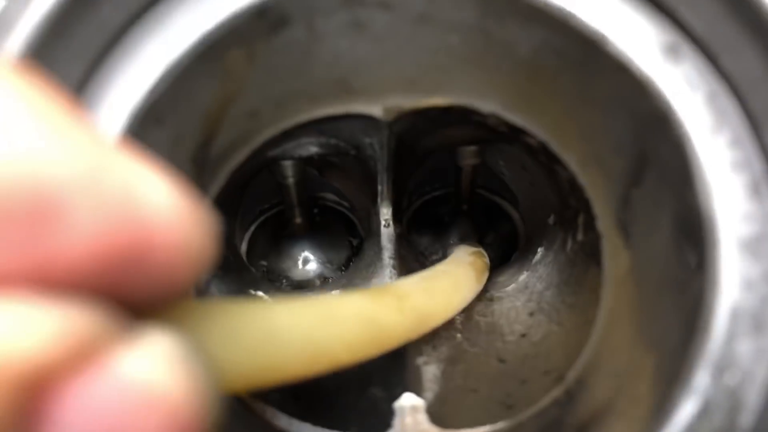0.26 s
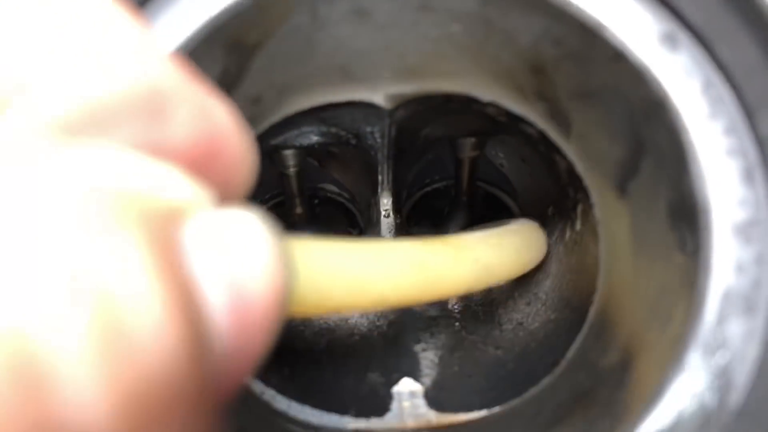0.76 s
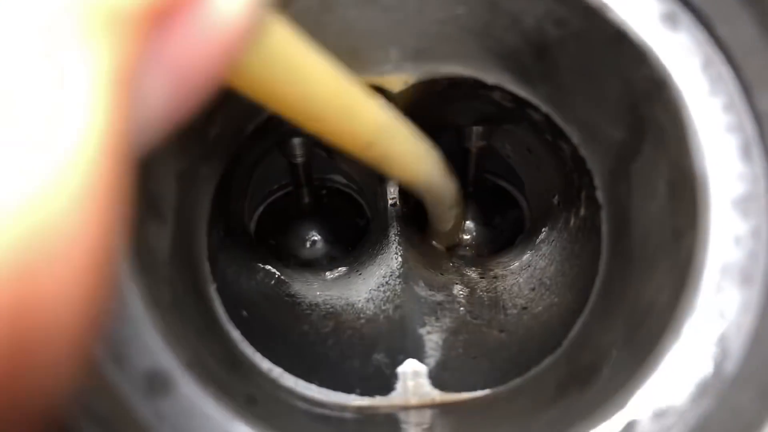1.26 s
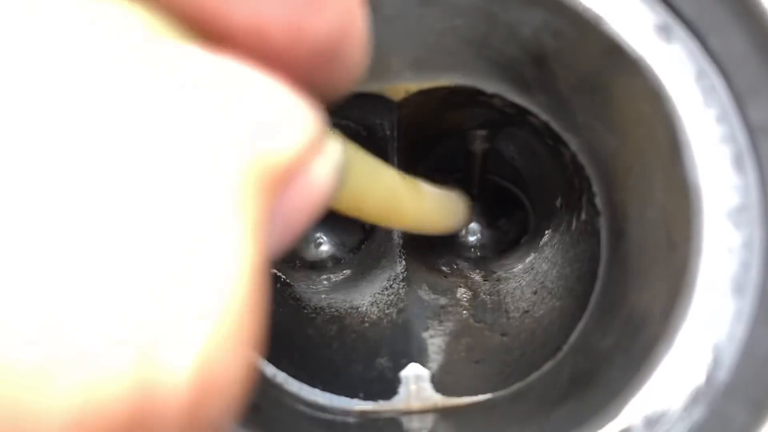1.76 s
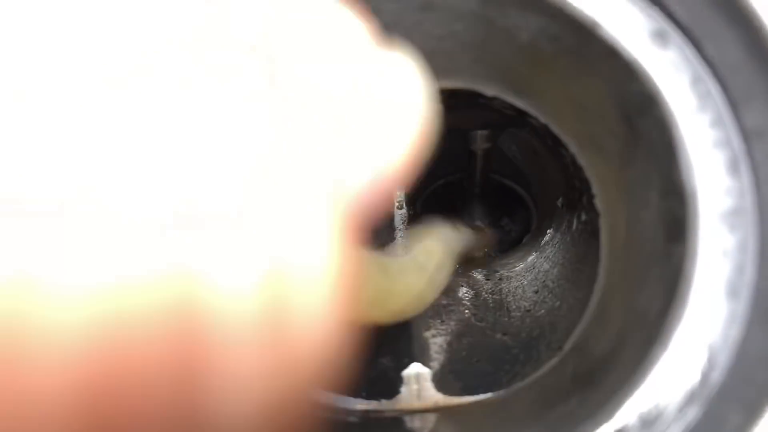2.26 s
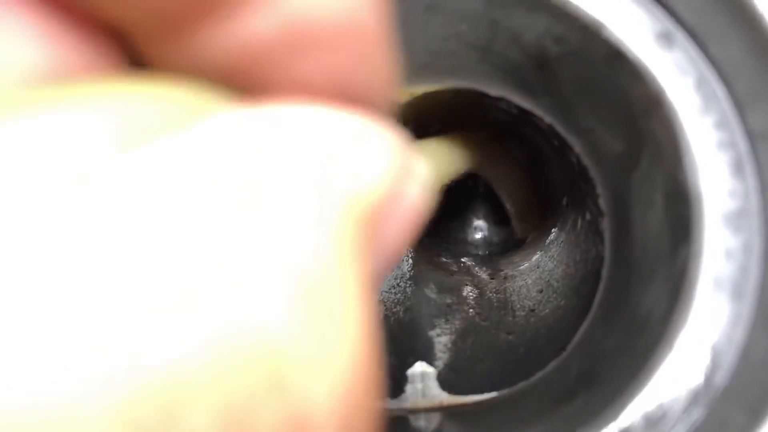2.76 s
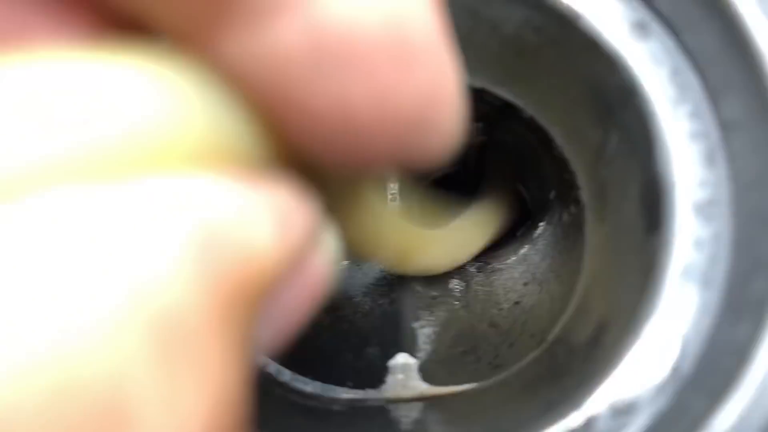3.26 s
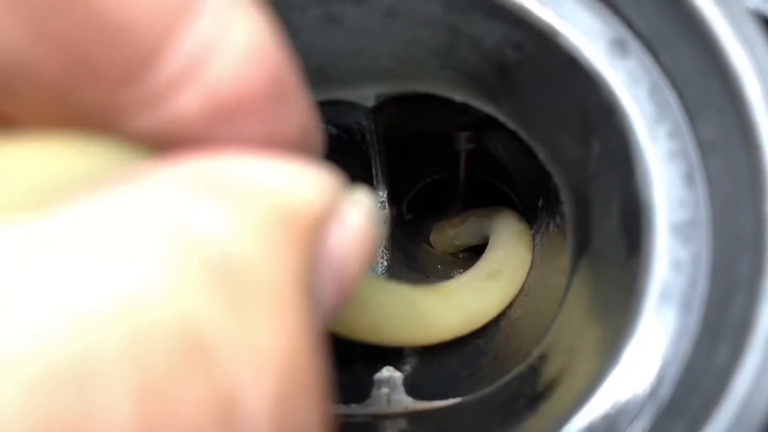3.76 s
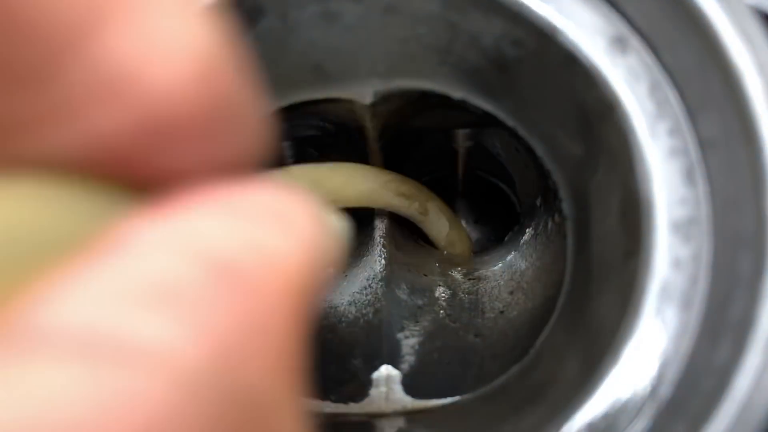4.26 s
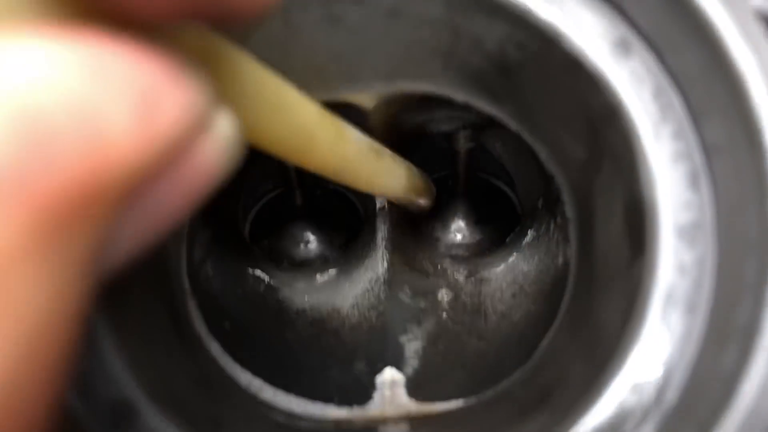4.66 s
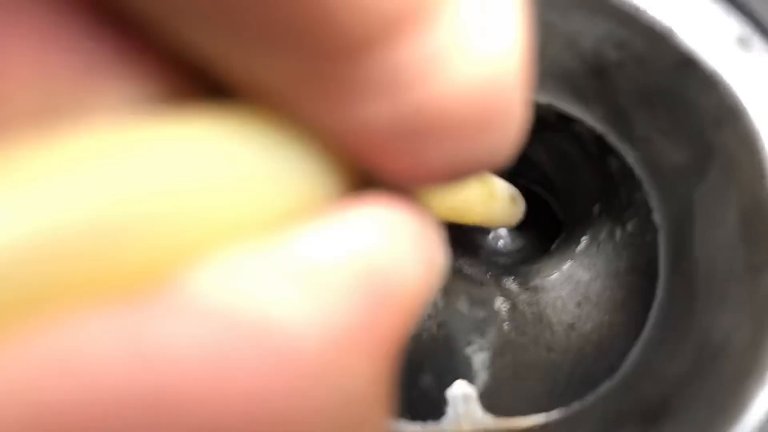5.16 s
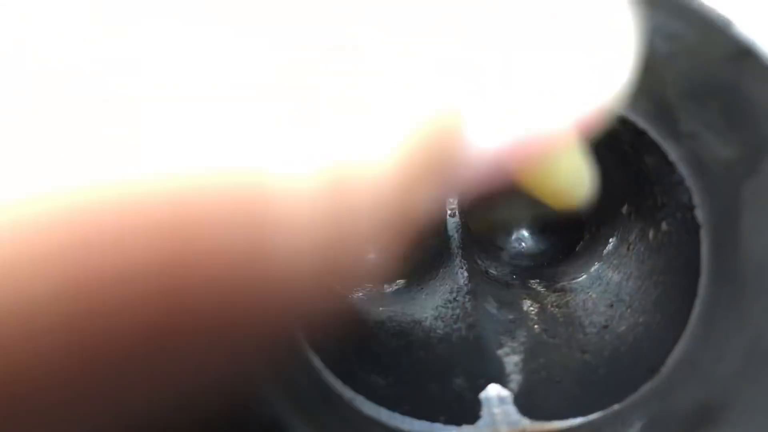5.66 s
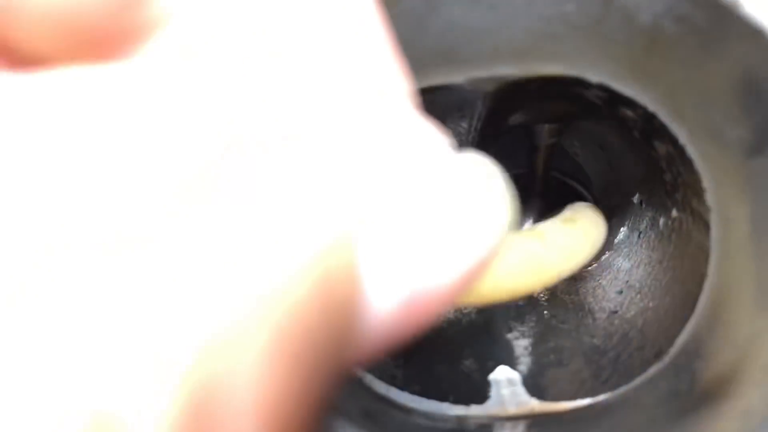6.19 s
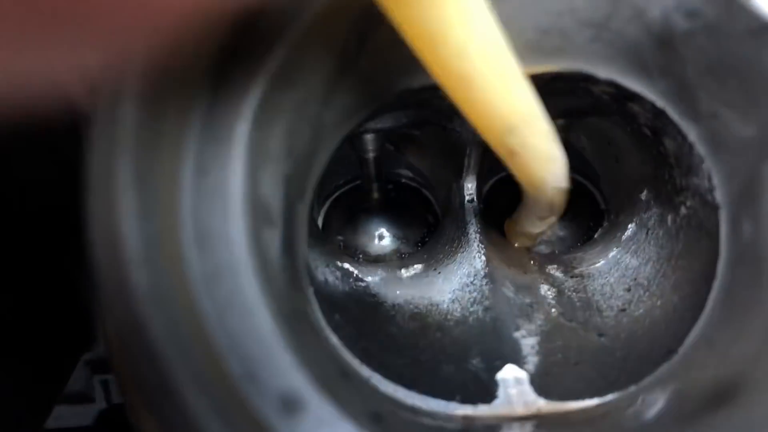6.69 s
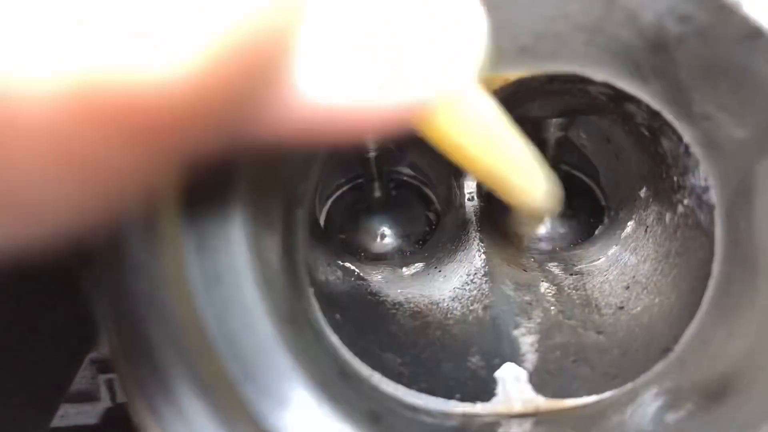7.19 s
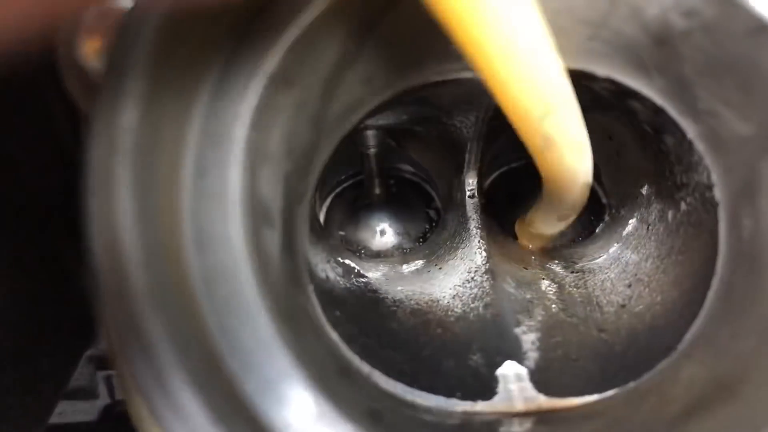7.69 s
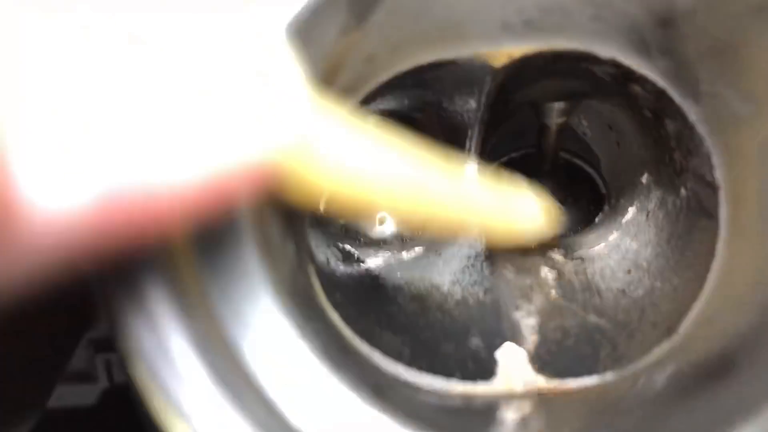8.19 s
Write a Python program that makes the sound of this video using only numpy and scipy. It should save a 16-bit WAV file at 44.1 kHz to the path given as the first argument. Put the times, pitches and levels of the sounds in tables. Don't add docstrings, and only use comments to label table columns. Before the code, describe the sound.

In a workshop, close up and mono, air rushes into a suction tip held in a hollow metal cavity. The breathy tone and wide hiss are interrupted by irregular wet spits and whistly, resonant bursts as the tip nears the wall, with short pops as it snaps shut or free. Low bumps knock the microphone early on. Later the open rush returns, punctuated by a final pop, over constant soft motor hum.

```python
import sys
import numpy as np
from scipy import signal
from scipy.fft import rfft, irfft, next_fast_len
from scipy.io import wavfile
from scipy.ndimage import uniform_filter1d, map_coordinates

SR = 44100
rng = np.random.default_rng(int(sys.argv[2]) if len(sys.argv) > 2 else 0)


def log_audio(samples):
    frames = np.atleast_2d(samples).T
    limited = np.clip(frames, -1, 1)
    pcm = np.round(limited * 32767).astype(np.int16)
    wavfile.write(sys.argv[1], SR, pcm)


def gain_from_decibels(decibels):
    exponent = np.asarray(decibels, float) / 20
    return 10 ** exponent


N = 372204

# (time [s], pipe tone [dB], rush [dB], third harmonic [dB])
OPEN_FLOW = [(0, -27.5, -25, -33), (.5, -33, -24, -37), (.93, -29.5, -21.5, -34.5), (1.03, -36, -19.5, -41),
             (1.14, -32, -26, -38), (1.3, -35.5, -25, -37.5), (2.4, -34, -24.5, -34.5),
             (2.66, -28, -25, -39), (3.15, -34, -25, -36), (4.22, -32, -25, -35), (4.47, -25.5, -20, -28),
             (4.73, -33, -26, -39), (5.6, -27.5, -24, -28.5), (5.85, -29.5, -26.5, -38.5),
             (6.22, -30, -25.5, -35), (6.4, -40.5, -26.5, -39), (6.68, -32.5, -27.5, -40),
             (7.9, -27.5, -23, -29)]
# (pitch [Hz], width [Hz], level [dB])
PIPE_TONE = [(580, 42.6, 0)]
# (pitch [Hz], width [Hz], level [dB])
PIPE_THIRD = [(1650, 167, 0)]
# (time [s], pitch [Hz])
PIPE_PITCH = [(0, 598), (.6, 571.2), (1.2, 585.5), (1.8, 574.7), (2.2, 592.2), (2.9, 578.7), (3.5, 568.7),
              (4.1, 588.3), (4.6, 582), (5.5, 563.7), (6.1, 580), (6.8, 578.5), (7.7, 592.2), (8.44, 583.4)]
# (frequency [Hz], level per Hz [dB])
THROAT_ROAR = [(120, -44), (300, -31.5), (800, -18), (1300, -23.5), (2200, -29.5), (4000, -65)]
# (from [s], [(pitch [Hz], width [Hz], level [dB])])
RUSH_NOTES = [
    (0, [(5440, 300, -5.5), (6530, 210, 2), (9030, 130, -1), (9800, 200, -2), (10400, 200, -8), (11560, 350, -0.5), (12300, 400, -2.5), (13400, 200, -6)]),
    (1.1, [(5400, 290, -11), (5700, 340, -3.5), (6420, 290, -3), (7240, 160, -2.5), (8650, 250, -11.5), (9840, 280, -6), (11370, 530, 1), (12600, 540, -4.5), (15450, 270, -11)]),
    (4.7, [(5760, 230, -4), (6350, 180, -5), (8000, 240, -15), (9360, 340, -7), (10300, 200, -4), (11420, 190, 1.5), (12100, 370, -6), (12800, 380, -6)]),
    (6.6, [(5730, 310, -5.5), (6300, 200, -2.5), (7100, 230, -11), (8040, 150, -15), (9000, 250, -5.5), (10000, 250, -5.5), (11340, 340, 1.5), (12700, 400, 2.5), (13000, 180, -15), (14400, 300, 0)]),
]
# (pitch [Hz], width [Hz], level [dB])
RUSH_ALWAYS = [(2290, 140, -11), (2800, 140, -23), (3825, 100, -8), (4704, 150, -4)]
# (frequency [Hz], level per Hz [dB])
RUSH_BETWEEN = [(900, -23), (2200, -14.5), (4200, -13.5), (6000, -9), (9000, -9), (13000, -10.5),
                (15800, -11.5)]
# (time [s], level [dB])
SEAL = [
    (1.005, 5.5),
    (1.03, -8),
    (1.068, -17),
    (1.076, 2),
]
# (start [s], hold [s], first level [dB], last level [dB], lengthwise against crosswise notes [dB])
SQUEEZES = [(0.718, .038, -22, -16, -11), (0.761, 0.046, -12, -13.5, -11.5), (.81, 0.043, -17, -18, -11.5),
            (0.857, 0.06, -13.5, -14, -16.5), (0.912, 0.071, -14, -19, -14),
            (.978, 0.029, -12.5, -10, -11.5), (1.009, 0.051, -12, -9.5, -12),
            (1.075, 0.011, -15, -14.5, -9.5), (1.997, .05, -23.5, -16.5, -6),
            (2.049, .05, -16.5, -13, -4.5), (2.098, 0.11, -13.5, -13.5, -3.5),
            (2.206, .028, -13.5, -24, -6), (2.346, 0.0054, -8, -10.5, -10.5), (2.35, 0.015, -15, -24, -6),
            (2.583, 0.16, -26, -17.5, -6.5), (2.728, .06, -15.5, -16.5, -7.5),
            (2.789, 0.086, -16, -16.5, -10.5), (2.87, 0.048, -17, -23, -8.5), (3.013, .035, -27, -22, -9),
            (3.051, 0.14, -20.5, -19, -8.5), (3.182, 0.14, -20, -20, -9), (3.533, .014, -14, -11.5, -5),
            (3.55, 0.024, -10, -12, -19), (3.571, .02, -15, -25, -9.5), (4.006, 0.045, -18.5, -12.5, -12),
            (4.056, .01, -8, -11, -13), (4.068, 0.029, -12, -23, -10.5), (4.277, .036, -8.5, -12.5, -9),
            (4.307, 0.12, -10, -13.5, -6), (4.44, 0.17, -12.5, -16, -9), (4.6, 0.043, -18, -21, -9.5),
            (4.644, .034, -22, -16, -7.5), (4.688, 0.0035, -10.5, -11.5, -13), (6.199, 0.04, -21, -18, -8),
            (6.246, 0.03, -10.5, -8, -16), (6.284, 0.075, -9.5, -9.5, -15), (6.369, .035, -8.5, -11.5, -15),
            (6.403, 0.084, -12.5, -14, -17), (6.487, .04, -11.5, -11, -17.5),
            (6.527, 0.037, -13, -21, -14.5), (6.566, 0.035, -18, -15.5, -9.5)]
# (closest [s], half length [s], level [dB], lengthwise against crosswise notes [dB])
GRAZES = [(.63, 0.14, -25, -7.5), (1.683, .06, -30, -4), (5.36, 0.16, -28.5, -7.5), (5.6, .13, -25.5, -12),
          (5.79, 0.0089, -24.5, -8), (7.105, .035, -27.5, -14), (7.241, 0.052, -29.5, -18),
          (3.66, 0.089, -26, -11), (7.28, .012, -25, -7)]
# (time [s], length [s], level [dB])
SPITS = [(1.044, 0.021, -10.5), (1.085, 0.016, -17), (3.205, 0.19, -23), (3.566, 0.026, -19),
         (4.678, .012, -11), (4.69, .008, -14), (6.274, 0.093, -26), (6.45, 0.081, -21),
         (6.584, 0.028, -21)]
# (pitch [Hz], width [Hz], level [dB])
LENGTHWISE = [(582, 42, 2), (1652, 146, 0.5), (2520, 120, -6), (2820, 310, -2), (3717, 190, -2)]
# (frequency [Hz], level per Hz [dB])
LENGTHWISE_BETWEEN = [(700, -19), (1100, -20), (2100, -28), (3300, -15), (4300, -15), (5000, -23),
                      (6000, -45)]
# (pitch [Hz], width [Hz], level [dB])
CROSSWISE = [(3750, 250, -2), (4450, 170, 0.5), (4730, 150, -3), (5390, 127, 2), (5650, 278, -2),
             (6100, 250, -2), (6430, 195, 1.5), (6850, 330, -1.5), (7070, 220, -1.5), (7400, 320, -1.5),
             (8670, 180, -6), (9440, 230, -2), (9540, 200, -0.5), (9950, 350, -0.5)]
# (frequency [Hz], level per Hz [dB])
CROSSWISE_BETWEEN = [(3500, -38), (4300, -27.5), (7000, -17), (8300, -20), (10000, -25), (11500, -29)]
# (frequency [Hz], level per Hz [dB])
THIN_HISS = [(9000, -19), (11500, -0.5), (13000, -3.5), (15800, -5.5)]
# (from [s], [(pitch [Hz], level [dB])])
TIP_POSITIONS = [(0, [(6430, -1), (7070, -3), (9350, -10)]), (.86, [(6430, 0), (7000, 0), (5700, -1),
                 (9540, -17)]), (.97, [(6450, -2), (7100, 0), (9500, -5)]), (1.02, [(6400, 2.5), (7300, 0),
                 (10000, -10)]), (1.068, [(5400, -3), (7100, 2), (9450, 1)]), (1.5, [(5370, -1), (6500, -3),
                 (9800, -3)]), (2.07, [(6400, 0), (7060, 1), (5350, 0), (10000, -2)]), (2.3, [(7000, 3.5),
                 (5600, -1), (3750, -4), (9950, 1)]), (2.5, [(6700, 3), (7300, 1), (5400, -5), (9700, -4)]),
                 (2.68, [(5380, 1), (3750, 2), (4500, -7), (9500, -3.5)]), (2.8, [(5650, 0.5), (3750, -3.5),
                 (4500, -4), (9800, -3)]), (2.96, [(5600, 1.5), (7400, -3), (6400, -4.5), (10000, -6)]),
                 (3.45, [(6560, 2), (5500, -5), (9540, -4)]), (3.9, [(5400, -1.5), (6430, -4),
                 (9540, -6.5)]), (4.2, [(5430, 0.5), (6600, -6), (9750, -4.5)]), (4.315, [(6950, 2),
                 (6300, 0.5), (4450, -3), (9540, -2.5)]), (4.44, [(6200, 2), (7200, -2.5), (9500, -3.5)]),
                 (4.55, [(7200, 1), (6360, -1), (5400, -4), (9500, -3)]), (4.643, [(6450, 0), (7300, 0),
                 (9450, -4)]), (5, [(5440, 1.5), (4670, -0.5), (9540, -14)]), (6, [(6410, -0.5), (7070, -8),
                 (3750, -9), (9890, -9)]), (6.33, [(6430, -1), (7070, -7), (9540, -9)]),
                 (6.535, [(6450, -1), (7200, -2), (9600, -7.5)]), (7, [(5400, 0), (6430, 0), (9540, -21)])]
# (from [s], level [dB])
LOW_LEAN = [(0, 0), (.75, 2.5), (.97, -1.5), (1.07, 3.5), (1.5, -4), (2.3, -4), (2.5, -0.5), (2.96, -1),
            (3.45, -3), (3.9, 7), (4.201, -7), (4.305, -0.5), (4.44, 1), (4.55, 4), (4.643, 2), (5, 0),
            (6, -4), (6.535, -3), (7, 4)]
# (time [s], peak [dB], brightness [dB])
POPS = [(1.076, -16, -6), (2.343, -27, 0), (2.586, -27, 5), (3.533, -15, -1), (4.276, -29, 12),
        (6.245, -23, 0), (6.597, -18, -11), (7.283, -11.5, -11)]
# (pitch [Hz], level [dB], time to fall 60 dB [s])
POP_LENGTHWISE = [(603, 2, 0.043), (1640, -1, 0.045), (2780, -10, .012), (3750, -8, .012)]
# (pitch [Hz], level [dB], time to fall 60 dB [s])
POP_CROSSWISE = [(5400, 10.5, 0.023), (6420, 7, .018), (9500, -5, .012)]
# (frequency [Hz], width [Hz], depth [0-1])
HOLLOWS = [(1410, 68, 0.32), (2017, 290, 0.21), (4200, 120, 0.28)]
# (time [s], peak [dB], pitch [Hz], length [cycles])
THUMPS = [(1.084, -44, 245, 2), (1.912, -29, 111, 1.3), (2.004, -21, 144, 1.4), (2.038, -22, 195, 2.2),
          (2.061, -24, 89, 1.1), (2.114, -26, 140, 1.9), (2.169, -25, 122, 1.5), (2.22, -23, 142, 1.8),
          (2.446, -22, 122, 1.5), (2.458, -27, 100, 1.5), (2.492, -22, 110, 1.2), (2.527, -23, 150, 2),
          (2.579, -15, 260, 1.2), (2.609, -24, 100, 1.4), (2.64, -26, 215, 2), (2.683, -3, 295, 0.72),
          (2.7, -13, 149, 0.75), (2.713, -19, 90, 1), (2.87, -26, 166, 2), (2.902, -14, 200, 1.2),
          (2.912, -19, 220, 1.6), (2.949, -28, 104, 1.5), (3.017, -26, 330, 1.8), (3.024, -25, 230, 1.4),
          (3.032, -23, 140, 1.4), (3.066, -25, 300, 1.5), (3.074, -21, 150, 1.2), (3.085, -25, 90, 1.3),
          (3.211, -32, 330, 2), (3.269, -21, 90, 1.3), (3.297, -23, 110, 1.6), (3.309, -18, 130, 0.83),
          (3.334, -25, 94, 1.5)]
# (time [s], level [dB])
DRAUGHT = [(0, -44.5), (1.6, -41), (2.1, -33), (2.3, -44), (2.7, -39), (3.3, -35), (3.43, -44.5), (6, -42),
           (6.5, -50)]
# (time [s], level [dB])
HUM = [(0, -48), (1.6, -44.5), (2.2, -46), (3.2, -48), (3.5, -43), (6, -42.5), (6.5, -44.5), (7.36, -38)]
# (frequency [Hz], level per Hz [dB])
HUM_COLOUR = [(22, -40), (46, -12.5), (70, -4), (150, -3.5), (250, -7.5), (480, -2), (620, -20),
              (1060, -120)]
# (pitch [Hz], level [dB])
MOTOR = [(242.2, -56.5)]


def inflow():
    tone_db, rush_db, third_db = curves(OPEN_FLOW)
    tone = gain_from_decibels(tone_db + 1.3 + 1.37 * wobble(11)) * bent(air(PIPE_TONE, patchy_db=-0.1, sharp=1.25))
    roar = gain_from_decibels(0.53 * tone_db - 24.5) * air(between=THROAT_ROAR, patchy_db=2.5)
    third = gain_from_decibels(third_db - 2.5) * air(PIPE_THIRD, patchy_db=2.2, sharp=0.94)
    shaded = [(start, notes + RUSH_ALWAYS) for start, notes in RUSH_NOTES]
    rush_gain = gain_from_decibels(rush_db + 3.0 + 0.78 * wobble(9) + 0.48 * wobble(60))
    rush = rush_gain * air(between=RUSH_BETWEEN, moving=shaded, patchy_db=1.96, sharp=0.88)
    return gain_from_decibels(0.59 * curves(SEAL)[0]) * (tone + roar + third) + rush


def bent(tone):
    place = np.cumsum(curves(PIPE_PITCH)[0] / PIPE_TONE[0][0])
    return np.interp(place % (N - 1), np.arange(N), tone)


def jet():
    t = np.arange(N) / SR
    along_gain, across_gain = uniform_filter1d(squeezing(), size=80, axis=1)
    spits = sum(gain_from_decibels(db) * np.exp(-(2 * (t - s) / length) ** 2) for s, length, db in SPITS)
    spit_gain = gain_from_decibels(-17.0) * across_gain + spits
    flutter = gain_from_decibels(0.51 * wobble(24.98) + 1.34 * wobble(150) + 0.56 * wobble(700))
    ringing = leaning(air(LENGTHWISE, LENGTHWISE_BETWEEN, patchy_db=1.7, sharp=1.03))
    along = gain_from_decibels(0.5 + 0.75 * curves(SEAL)[0]) * along_gain * ringing
    lit_notes = [(start, favoured(lit)) for start, lit in TIP_POSITIONS]
    across = gain_from_decibels(-0.56) * across_gain * air(between=CROSSWISE_BETWEEN, moving=lit_notes, patchy_db=1.5, sharp=1.21)
    thin = air(between=THIN_HISS, patchy_db=1.5)
    return unit(flutter) * (along + across + spit_gain * thin)


def squeezing():
    close_db_per_s, open_db_per_s = 3000, 1300
    kick_db, kick_s = 0.5, 0.033
    t, levels = np.arange(N) / SR, np.full((2, N), -120.)
    for start, hold, first_db, last_db, along_db in SQUEEZES:
        near = slice(round((start - .05) * SR), round((start + hold + .1) * SR))
        u = t[near] - start
        across = np.interp(u, [0, hold], [first_db, last_db])
        across = across + close_db_per_s * np.minimum(u, 0) - open_db_per_s * np.maximum(u - hold, 0)
        along = across + along_db + kick_db * np.exp(-np.abs(u) / kick_s)
        levels[:, near] = np.maximum(levels[:, near], [along, across])
    for closest, half, db, along_db in GRAZES:
        across = db - 4 * ((t - closest) / half) ** 2
        levels = np.maximum(levels, [across + along_db, across])
    return gain_from_decibels(levels)


def leaning(x):
    m = next_fast_len(N)
    low = irfft(rfft(x, m) * (np.fft.rfftfreq(m, 1 / SR) < 2050), m)[:N]
    start, db = np.transpose(LOW_LEAN)
    steps = gain_from_decibels(db)[np.searchsorted(start, np.arange(N) / SR, "right") - 1]
    return x + (uniform_filter1d(steps, size=400) - 1) * low


def favoured(lit):
    fall_db_per_octave, split_hz = 82, 8300
    unlit_db, unlit_slope, high_unlit_db = -5.5, 0.084, -6.5
    *low, (high_hz, high_db) = lit

    def away(hz, best):
        return -fall_db_per_octave * abs(np.log2(hz / best))

    def lift(hz):
        if hz > split_hz:
            return high_db + max(away(hz, high_hz), high_unlit_db)
        kept = unlit_db + low[1][1] + unlit_slope * away(hz, low[0][0])
        return max([db + away(hz, best) for best, db in low] + [kept])

    return [(hz, width, db + lift(hz)) for hz, width, db in CROSSWISE]


def hollowed(x):
    m = next_fast_len(N + 8192)
    hz = np.fft.rfftfreq(m, 1 / SR)
    dips = [1 - np.clip(depth, 0, .9) * np.exp(-((hz - c) / width) ** 2) for c, width, depth in HOLLOWS]
    return irfft(rfft(x, m) * np.prod(dips, axis=0), m)[:N]


def pops():
    out, t = np.zeros(N), np.arange(3000) / SR

    def ring(notes):
        return sum(gain_from_decibels(db - 60 * t / t60 + rng.normal(0, 1.8)) * np.sin(2 * np.pi * hz * t)
                   for hz, db, t60 in notes)

    for start, db, bright_db in POPS:
        crack = 0.64 * gain_from_decibels(-60 * t / 0.023) * rng.standard_normal(len(t))
        burst = ring(POP_LENGTHWISE) + gain_from_decibels(bright_db) * ring(POP_CROSSWISE) + crack
        out[round(start * SR):][:len(t)] += gain_from_decibels(db - 2.0) * burst * (1 - np.exp(-t / 0.0011))
    return out


def thumps():
    out, t = np.zeros(N), np.arange(-2000, 2000) / SR
    for s, db, hz, cycles in THUMPS:
        fade = np.exp(-(2 * hz * t / cycles * np.where(t < 0, 1.5, .8)) ** 2)
        swing = -np.cos(2 * np.pi * hz * t) - 0.37 * np.cos(3.8 * np.pi * hz * t)
        out[round(s * SR) - 2000:][:len(t)] += gain_from_decibels(db - 1.5) * swing * fade
    return out


def workshop():
    deep_db = curves(DRAUGHT)[0] + 0.85 * wobble(3.6)
    deep = air([(78.5, 67, 0)], patchy_db=1.5, sharp=1.57)
    hum = air(between=HUM_COLOUR, patchy_db=1.6)
    drift = np.cumsum(1 + 0.00404 * wobble(3.006)) / SR
    motor = sum(gain_from_decibels(db - 2.0 + 4.0 * wobble(2.1)) * np.sin(2 * np.pi * hz * drift) for hz, db in MOTOR)
    return gain_from_decibels(deep_db - 4) * deep + gain_from_decibels(curves(HUM)[0]) * hum + motor


def air(modes=(), between=None, patchy_db=1.5, sharp=0.91, moving=()):
    hz, t, z = signal.stft(rng.standard_normal(N + 512), SR, nperseg=512)
    field = uniform_filter1d(uniform_filter1d(rng.standard_normal(z.shape), size=3, axis=0), size=24, axis=1)
    ripple = uniform_filter1d(rng.standard_normal(z.shape), size=80, axis=1)
    z = z * gain_from_decibels(patchy_db * (0.61 * unit(field) + 1.48 * unit(ripple)))
    if moving:
        sets = np.array([unit(power(hz, notes, between) ** (sharp / 2)) for _, notes in moving])
        current = np.searchsorted([start for start, _ in moving], t, "right") - 1
        z = z * uniform_filter1d(sets[current].T, size=3, axis=1)
    noise = signal.istft(z, nperseg=512)[1][:N]
    if not moving:
        m = next_fast_len(N + 8192)
        colour = power(np.fft.rfftfreq(m, 1 / SR), modes, between) ** (sharp / 2)
        noise = irfft(rfft(noise, m) * colour, m)[:N]
    return unit(noise)


def power(hz, modes=(), between=None):
    total = sum(gain_from_decibels(db) ** 2 * (hz * w) ** 2 / ((c * c - hz * hz) ** 2 + (hz * w) ** 2) for c, w, db in modes)
    if between:
        f, db = np.transpose(between)
        total = total + gain_from_decibels(np.interp(np.log(hz + 1), np.log(f), db, left=-80)) ** 2
    return total


def wobble(rate):
    coarse = np.arange(0, N + 16, 16)
    knots = map_coordinates(rng.standard_normal(int(N * rate / SR) + 4), [coarse * rate / SR])
    return np.interp(np.arange(N), coarse, knots)


def curves(rows):
    s, *columns = np.transpose(rows)
    return [np.interp(np.arange(N) / SR, s, column) for column in columns]


def unit(x):
    return x / np.sqrt(np.mean(x ** 2) + 1e-20)


def scene():
    port = hollowed(inflow() + jet())
    background = gain_from_decibels(curves(SEAL)[0]) * workshop()
    return np.tile(port + pops() + thumps() + background, (2, 1))


def top_cut(x):
    return signal.sosfilt(signal.butter(12, 16950, fs=SR, output="sos"), x)


def record(dry):
    low_hz, high_hz = 45, 15740
    soft = dry[0] / (1 + np.abs(dry[0] / .89) ** 5) ** (1 / 5)
    m = next_fast_len(N)
    hz = np.fft.rfftfreq(m, 1 / SR)
    band = (hz < high_hz) / np.sqrt(1 + (low_hz / (hz + 1)) ** 6)
    mix = np.tile(irfft(rfft(soft, m) * band, m)[:N], (2, 1))
    return top_cut(mix)


dry = scene()
out = record(dry)
log_audio(out)
```